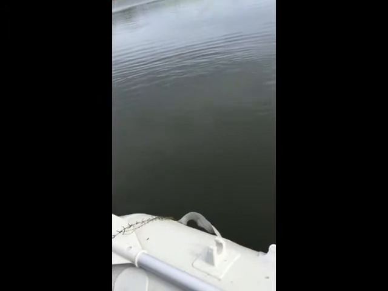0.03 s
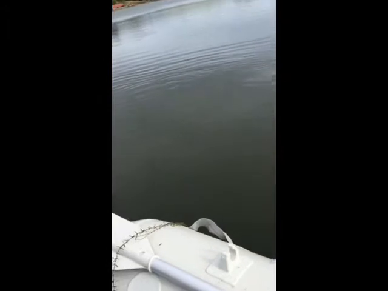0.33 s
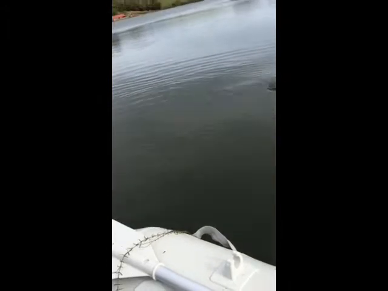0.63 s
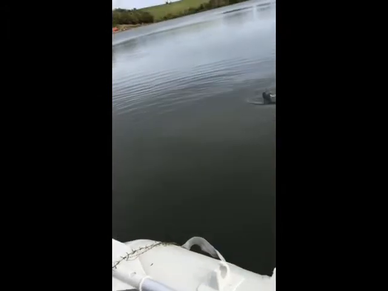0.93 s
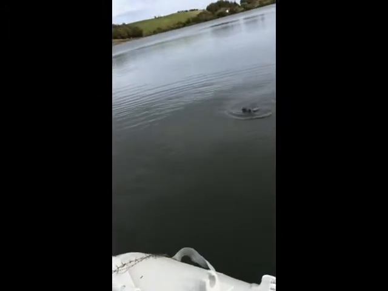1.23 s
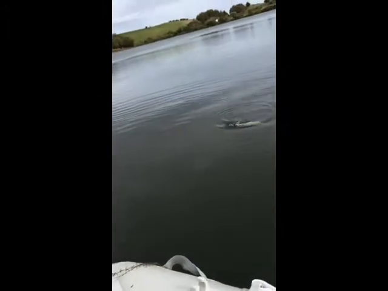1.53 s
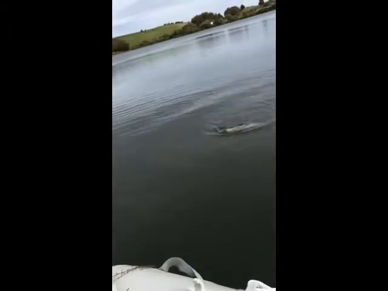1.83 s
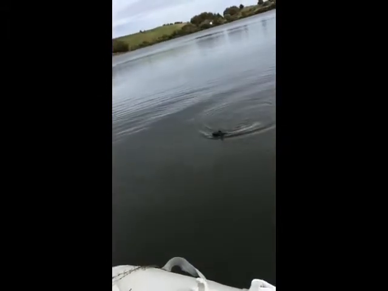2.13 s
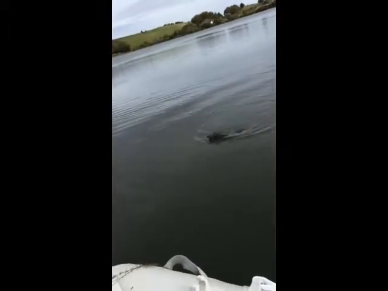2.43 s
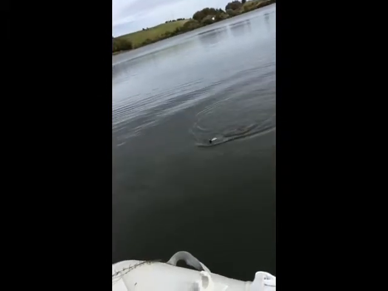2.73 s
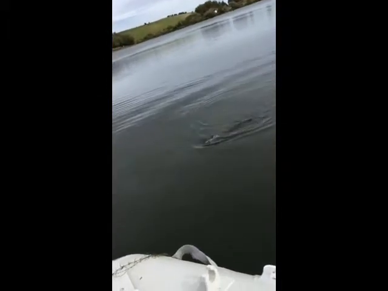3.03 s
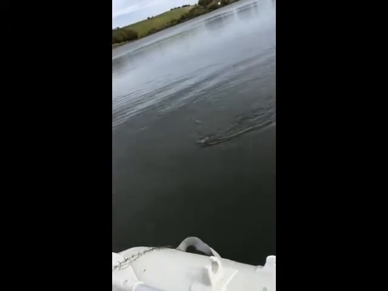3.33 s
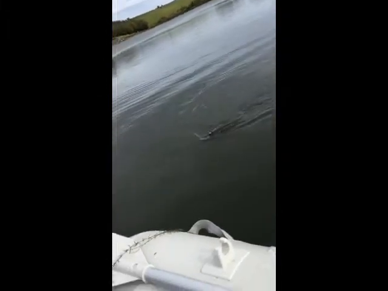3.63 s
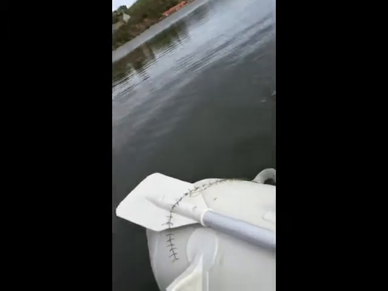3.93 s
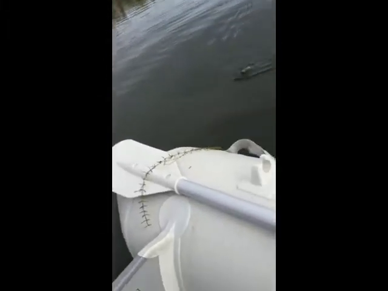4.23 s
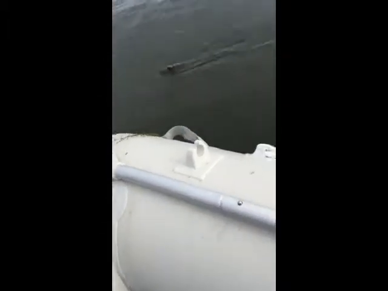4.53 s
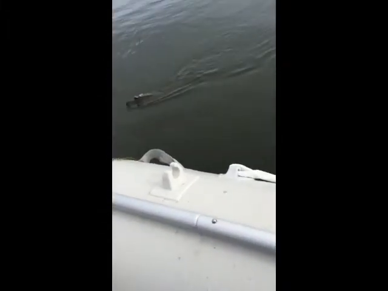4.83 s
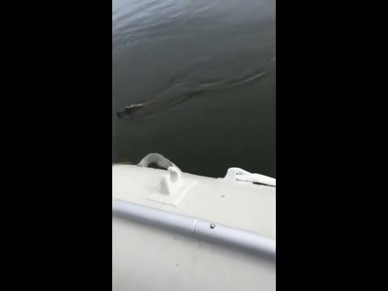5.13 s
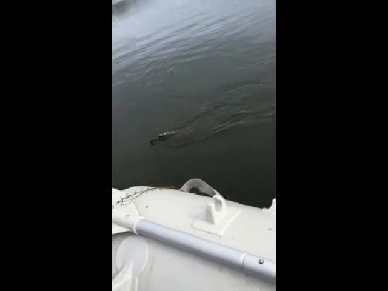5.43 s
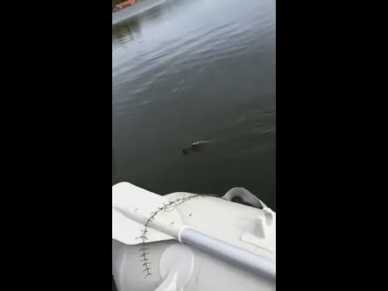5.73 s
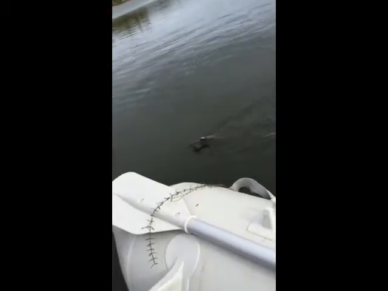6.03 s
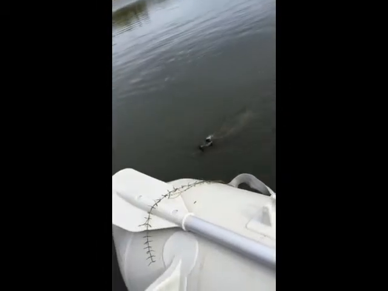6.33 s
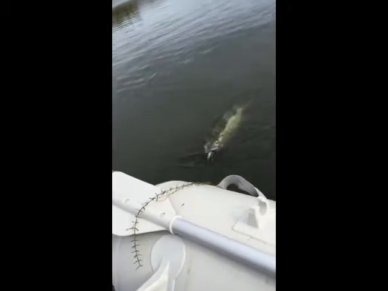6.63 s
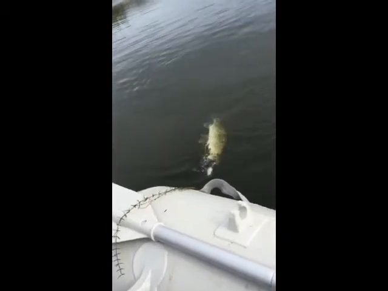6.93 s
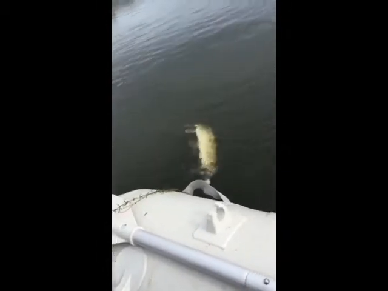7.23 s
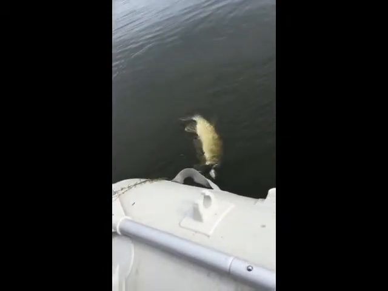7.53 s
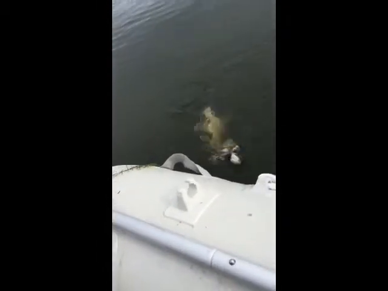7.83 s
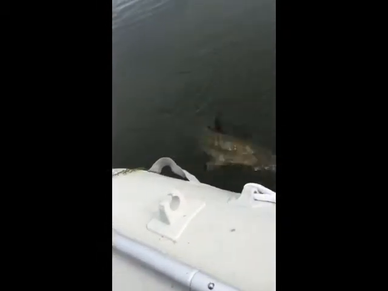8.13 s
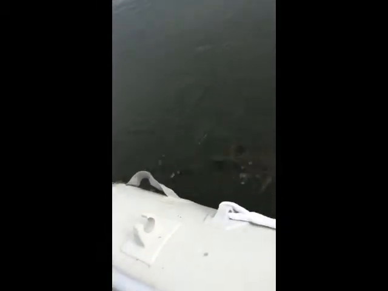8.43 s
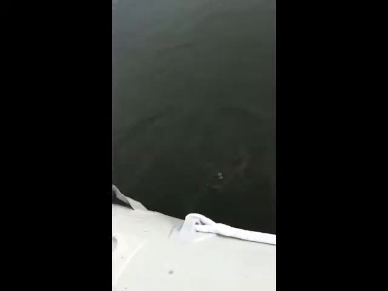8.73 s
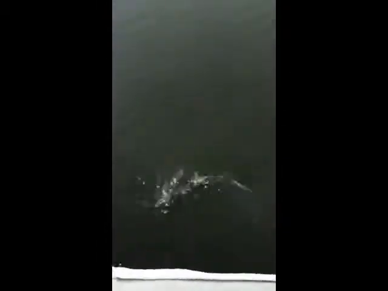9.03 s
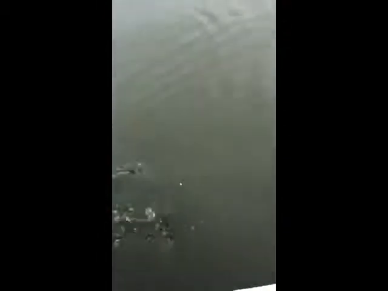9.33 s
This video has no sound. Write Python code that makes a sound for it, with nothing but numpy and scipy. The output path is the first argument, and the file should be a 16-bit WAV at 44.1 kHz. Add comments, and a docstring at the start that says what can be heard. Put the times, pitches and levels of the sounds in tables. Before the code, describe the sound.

A soft wash of open air and low wind bumps lie under seven short waterfowl yelps and a few faint, distant songbird whistles. After the calls stop, a fish splashes close to the microphone beside a boat and fishing line runs out with a brief hiss. A second, louder splash follows, a quick smack with gurgling water, bubbles and drops falling back on the lake.

```python
"""A calm lake, the microphone by an inflatable boat. A hooked fish is drawn in across the water; the
line hisses out, and the fish swirls and dives close by with a slap of its tail. Spray ticks on the
surface, trapped bubbles ring and the hole in the water gulps shut. A waterfowl yelps about once a
second, echoed by the shore, small birds whistle far off, and light wind bumps the microphone."""
import sys
import numpy as np
from scipy import signal
from scipy.fft import rfft, irfft, next_fast_len
from scipy.io import wavfile
from scipy.ndimage import map_coordinates

SR = 44100
rng = np.random.default_rng(int(sys.argv[2]) if len(sys.argv) > 2 else 0)


def wrap_up_sound(samples):
    """Save the sound to the file named by the first command line argument, as 16-bit audio."""
    columns = np.atleast_2d(samples).T
    # keep every value between -1 and 1, then stretch to whole-number steps
    tamed = np.clip(columns, -1, 1)
    steps = np.round(tamed * 32767).astype(np.int16)
    wavfile.write(sys.argv[1], SR, steps)


N = 418509
T = np.arange(N) / SR
BAND_LIMIT_HZ = 15420

# far wash of open air, relative levels: (time [s], low part [dB], middle part [dB], top part [dB])
AIR_LEVELS = [(0, -53, -56.5, -66.5), (0.7, -51.5, -55.5, -63), (1.4, -50, -50.5, -59.5),
              (2.1, -49.5, -51, -60), (3.0, -52.5, -51.5, -61), (3.2, -58, -49.5, -61.5),
              (3.65, -53, -48.5, -59.5), (3.9, -67, -50, -64), (4.3, -57.5, -51.5, -65.5),
              (4.8, -56, -55.5, -68), (5.15, -54.5, -58.5, -69), (5.55, -51.5, -53.5, -74),
              (6.1, -57, -58.5, -66.5), (6.45, -56.5, -58, -64.5), (7.3, -60, -58, -66),
              (7.8, -55.5, -56, -70), (8.3, -51.5, -46.5, -61), (8.9, -56, -49.5, -89),
              (9.49, -54, -47, -77)]
# faint drone in the wash: (time [s], level [dB])
DRONE_LEVELS = [(0, -68), (1.2, -63.5), (1.65, -49.5), (2.3, -58.5), (2.8, -52.5), (3.3, -58.5), (4.0, -55),
                (4.8, -69), (5.6, -60), (6.0, -65.5), (6.35, -54.5), (7.2, -67), (9.49, -57)]
# spectra of the wash's three parts, its drone and the microphone's hiss: (frequency [Hz], gain [dB])
AIR_LOW_SPECTRUM = [(20, -31), (70, -5.5), (150, -4), (260, 1), (450, -5), (700, -9), (1200, -13.5),
                    (3000, -60)]
AIR_MID_SPECTRUM = [(200, -51), (450, -8), (620, 0.5), (800, 0.5), (980, 0.5), (1170, 0), (1350, -3),
                    (1620, -5.5), (2000, -18), (3000, -46), (16000, -78)]
AIR_TOP_SPECTRUM = [(900, -42), (1400, 1), (1700, 4), (2050, -2.5), (2400, -3), (2700, -9.5), (3400, -12.5),
                    (5000, -26.5), (16000, -57)]
DRONE_SPECTRUM = [(780, -49), (910, -6), (980, -2), (1050, -9.5), (1200, -30), (1390, -7.5), (1560, -46),
                  (3000, -76)]
HISS_SPECTRUM = [(100, -16), (2500, 5.5), (5000, -1), (9000, -5.5), (11500, -6.5), (15500, -12)]

# breeze at the microphone: (time [s], relative level [dB])
BREEZE_LEVELS = [(0, -61.5), (1.3, -54.5), (2.2, -51.5), (3.5, -50.5), (3.9, -57), (4.55, -51.5),
                 (4.85, -43), (5.25, -50), (5.85, -45.5), (6.3, -44.5), (6.9, -41), (7.8, -47.5),
                 (8.6, -51.5), (9.49, -62)]
# gusts that bump the microphone: (time [s], length [s], level [dB])
GUSTS = [(1.52, 0.045, -46), (1.68, 0.011, -44.5), (2.19, .02, -45), (2.49, 0.028, -46), (3.51, .02, -46.5),
         (3.64, 0.087, -49.5), (4.672, 0.018, -31), (4.73, 0.032, -38), (4.88, 0.051, -41),
         (5.7, 0.092, -44), (5.905, 0.012, -32.5), (5.945, 0.039, -39), (6.1, 0.019, -30),
         (6.165, 0.014, -38), (6.25, .05, -42), (6.435, 0.043, -36.5), (6.52, 0.043, -36),
         (6.605, .012, -37), (6.735, 0.026, -36), (6.87, 0.024, -38.5), (7.235, 0.0098, -34),
         (7.29, 0.029, -39), (7.695, 0.02, -43.5), (8.28, 0.021, -51), (9.345, 0.019, -44)]
# rumble of wind on the microphone: (frequency [Hz], gain [dB])
WIND_SPECTRUM = [(12, -49), (20, -32), (52, 0.5), (76, 1.5), (116, -4.5), (177, -15), (197, -12),
                 (221, -46), (260, -56), (340, -57), (570, -120)]

# waterfowl calls: (time [s], relative level [dB], lift of the top overtones [dB], top pitch [Hz])
YELPS = [(0.623, -36, 4, 855), (1.585, -39, 6, 840), (2.507, -37.5, 0, 839), (3.494, -39.5, 2.5, 857),
         (4.514, -38, -8, 851), (5.614, -38.5, 1.5, 843), (6.854, -39.5, 0, 837)]
# resonances of its throat: (frequency [Hz], gain [dB])
THROAT_SPECTRUM = [(750, -15), (1400, 6), (1650, 4.5), (2050, -11), (2450, -4), (2700, -0.5), (3000, -5.5),
                   (3400, -1), (3750, -24), (4200, -11.5), (5000, -27), (6200, -18), (8000, -34.5),
                   (12000, -31)]
# drops landing on the lake: (time [s], tick peak [dB], bubble peak [dB], bubble pitch [Hz])
DROPS = [(0.637, -48, -37.5, 6800), (0.641, -52, -40, 3600), (0.6565, -38, -40, 5150),
         (0.698, -56, -55, 6050), (8.078, -41, -34, 5970), (8.0777, -58, -36, 3520),
         (8.097, -31, -32.5, 1920), (8.157, -41, -30.5, 816), (8.2356, -33, -34.5, 6030),
         (8.298, -50, -44, 2660), (8.33, -34, -42, 11000), (8.336, -25.5, -30.5, 2460),
         (8.366, -41, -35.5, 8000), (8.515, -43, -40, 4500), (9.015, -36, -21.5, 2710),
         (9.0219, -32, -31, 3320), (9.0247, -30, -23, 6440), (9.032, -39, -46, 7500),
         (9.0375, -32, -37, 5970), (9.0495, -41, -45, 8500), (9.054, -35, -44, 3600),
         (9.061, -33, -31, 2970), (9.074, -24, -47, 4020), (9.0798, -28, -23.5, 1400),
         (9.093, -35, -31, 670), (9.103, -20.5, -39, 5570), (9.1197, -34, -48, 6000),
         (9.1445, -41, -42, 4650), (9.17, -31, -49, 4700), (9.186, -39, -46, 3300),
         (9.2092, -37, -26.5, 1320), (9.2325, -42, -49, 5400), (9.25, -39, -52, 5500),
         (9.257, -38, -38, 342), (9.2675, -35, -48, 3900), (9.3075, -41, -50, 5200),
         (9.314, -48, -41, 4350), (9.3415, -38, -31, 4030), (9.433, -42, -38.5, 2380)]
# distant songbirds: (time [s], length [s], relative level [dB], start pitch [Hz], end pitch [Hz])
WHISTLES = [(1.284, 0.12, -68, 6100, 5750), (2.838, 0.13, -63, 5890, 5740), (4.756, 0.06, -68, 3440, 3340),
            (4.842, 0.041, -69, 3220, 3070), (4.917, 0.12, -77, 5920, 5740),
            (5.415, 0.069, -77, 4350, 4250), (5.582, 0.03, -72, 4200, 4180), (7.524, 0.12, -68, 5890, 5850)]
# hollows closing in the water: (time [s], length [s], start pitch [Hz], end pitch [Hz],
# start level [dB], end level [dB], swell midway [dB], lateness of the glide [power], raggedness [0-1])
GULPS = [(1.932, 0.031, 629, 1294, -36.5, -45, 9.5, 1.01, 0.2),
         (8.215, 0.058, 75.5, 98, -29.5, -42, -1.5, 1.1, 1),
         (9.094, .115, 228.4, 629, -26.5, -25.5, -3.5, 3.5, 0.7),
         (9.21, .095, 323.6, 1250, -45, -26, -8.5, 6, 0.74),
         (9.243, .013, 1090, 600, -29, -34, -0.5, 0.97, 0.56)]

# slaps, from small laps to the smack of the tail: (time [s], peak [dB], centre [Hz], decay time [s])
SLAPS = [(3.806, -46.5, 1390, 0.0013), (4.033, -56, 1150, 0.0071), (8.262, -36.5, 190, 0.01),
         (8.301, -30.5, 3500, 0.0028), (9.068, -11, 1000, 0.00086), (9.081, -32, 1700, 0.0082),
         (9.194, -30.5, 780, 0.011), (9.2035, -29.5, 1500, 0.0017), (9.248, -42, 800, 0.004),
         (9.3327, -24, 900, 0.0018)]
# air driven under by the tail: (peak [dB], pitch [Hz], glide [octaves], time to the peak [s])
AIR_POCKETS = [(-16.5, 320, 1, 0.0025), (-19.5, 950, -0.35, 0.00075), (-27, 2430, -0.21, 0.0024)]

# thin swishes of the line: (time [s], length [s], level [dB])
LINE_SWISHES = [(4.36, 0.038, -60), (4.47, 0.051, -68.5), (4.62, 0.017, -69)]
# the line creeps out, then runs: (time [s], length [s], level [dB], rise time [s])
LINE_RUNS = [(8, 0.58, -58.5, 0.09), (8.532, 0.31, -50, 0.0064), (8.743, 0.08, -58, 0.027)]
# spectra of the swishing and the running line: (frequency [Hz], gain [dB])
SWISH_SPECTRUM = [(1500, -25), (3000, -9), (4500, 2), (8500, 2), (10500, 0), (15000, -5)]
RUN_SPECTRUM = [(880, -35), (1500, -26), (1780, -9), (2060, -5), (2410, 4.5), (2970, -1), (4080, 1),
                (4900, -4), (6240, -6), (7420, -10), (9400, -10), (14800, -18), (15500, -28), (16000, -47)]

# larger bubbles under the surface: (time [s], peak [dB], pitch [Hz])
BUBBLES = [(6.998, -47.5, 2620), (8.311, -33, 1800), (8.663, -40, 1740), (8.743, -34, 1860),
           (9.025, -34, 2280), (9.084, -29, 1430), (9.09, -31.5, 2350), (9.131, -41, 2500),
           (9.16, -46, 1380), (9.176, -47, 2480), (9.192, -46, 3260), (9.203, -33, 1430),
           (9.214, -30.5, 1010), (9.3327, -20.5, 1765), (9.34, -33, 930), (9.34, -37, 2400),
           (9.393, -39.5, 3350), (9.402, -46, 3450), (9.47, -39.5, 1870)]
# water thrown up by the fish: (time [s], relative level [dB])
THROWS = [(8.097, -46.5), (8.312, -40.5), (8.43, -47.5), (9.022, -49), (9.066, -37.5), (9.083, -43),
          (9.1, -42), (9.172, -50), (9.205, -48), (9.265, -44.5), (9.345, -42)]
# spectra of droplets, froth and churned water: (frequency [Hz], gain [dB])
SPATTER_SPECTRUM = [(400, -22), (1500, -6), (3500, -4), (7000, 0), (10000, 3), (16000, -10)]
FROTH_SPECTRUM = [(400, -10), (1200, 2), (2400, 6.5), (3500, 0.5), (6000, -18)]
CHURN_SPECTRUM = [(150, -33), (400, 7), (1200, 5), (2400, 0.5), (3500, -1), (5000, -24), (7000, -7),
                  (10000, -22), (16000, -16)]


def gain_of(db):
    """Decibels to gain."""
    return 10 ** (np.asarray(db) / 20)


def unit_rms(x):
    """Scales to rms 1."""
    return x / np.sqrt(np.mean(x ** 2) + 1e-20)


def db_at(spectrum, hz):
    """Reads a spectrum, its points joined on a log-frequency axis."""
    points_hz, db = np.transpose(spectrum)
    return np.interp(np.log(hz + 1), np.log(points_hz + 1), db)


def level(rows, column=1):
    """One dB column of a curve as a gain for every sample."""
    rows = np.asarray(rows)
    return gain_of(np.interp(T, rows[:, 0], rows[:, column]))


def add(mix, s, sound):
    """Mixes a sound in at time s."""
    part = mix[round(s * SR):][:len(sound)]
    part += sound[:len(part)]


def phase_of(hz):
    """Running phase of a moving pitch, in radians."""
    return 2 * np.pi * np.cumsum(hz) / SR


def coloured(x, spectrum):
    """Filters a signal by a spectrum, at rms 1."""
    size = next_fast_len(len(x))
    gains = gain_of(db_at(spectrum, np.fft.rfftfreq(size, 1 / SR)))
    return unit_rms(irfft(rfft(x, size) * gains, size)[:len(x)])


def noise(spectrum):
    """Noise with a given spectrum."""
    return coloured(rng.standard_normal(N), spectrum)


def wander(t, per_s):
    """A random curve of about unit size; it holds still after its last knot."""
    knots = rng.standard_normal(4096)
    return np.interp(t * per_s, np.arange(len(knots)), knots)


def clicks(per_s, spread_db):
    """Clicks at random moments, most of them small."""
    chance, size = rng.random(N), np.minimum(rng.exponential(1, N), 3)
    return (chance < per_s / SR) * gain_of(spread_db * size)


def patchy(x, depth_db, width_hz, length_s):
    """Lets each region of pitch swell and fade by itself, as sound does over moving air and water."""
    spectra = signal.stft(x, nperseg=512, noverlap=384)[2]
    bins, frames = np.indices(spectra.shape)
    where = [bins * SR / 512 / width_hz, frames * 128 / SR / length_s]
    patches = unit_rms(map_coordinates(rng.standard_normal((256, 800)), where, order=1))
    spectra = spectra * gain_of(depth_db * patches)
    return unit_rms(signal.istft(spectra, nperseg=512, noverlap=384)[1][:N])


def swell(s, length, rise_s, fall_s):
    """An envelope that grows up to time s, holds, and dies away."""
    rising = np.minimum((T - s) / rise_s, 0)
    falling = np.maximum(T - s - length, 0) / fall_s
    return np.exp(np.maximum(rising - falling, -30))


def swells(rows, rise_s, fall_s):
    """The joint envelope of events (time [s], length [s], level [dB])."""
    return np.sqrt(sum((gain_of(db) * swell(s, length, rise_s, fall_s)) ** 2 for s, length, db in rows))


def echoes(x, t60, top_hz):
    """A tail of sparse, dull reflections."""
    t = T[:SR]
    taps = rng.standard_normal(SR) * (rng.random(SR) < .1) * (t > .004) * gain_of(-60 * t / t60)
    taps = signal.sosfilt(signal.butter(2, top_hz, fs=SR, output="sos"), taps)
    return signal.oaconvolve(x, taps / np.linalg.norm(taps) * np.sqrt(2 * top_hz / SR))[:N]


def open_air():
    """A far wash in three parts that swell separately, a faint drone, and steady microphone hiss."""
    low = patchy(noise(AIR_LOW_SPECTRUM), depth_db=3, width_hz=129, length_s=.04)
    low *= level(AIR_LEVELS, column=1) * gain_of(0.82)
    middle = patchy(noise(AIR_MID_SPECTRUM), depth_db=2.5, width_hz=240, length_s=.035)
    middle *= level(AIR_LEVELS, column=2)
    drone = noise(DRONE_SPECTRUM) * level(DRONE_LEVELS)
    top = patchy(noise(AIR_TOP_SPECTRUM), depth_db=3, width_hz=416, length_s=.035)
    top *= level(AIR_LEVELS, column=3)
    flicker = gain_of(-0.16 + 0.72 * wander(T, 11))
    return low + drone + (middle + top) * flicker + gain_of(-70.5) * noise(HISS_SPECTRUM)


def wind(lumps_db=3.0, lumps_per_s=18):
    """Air rumbles right on the microphone: a lumpy breeze with brief gusts."""
    breeze = level(BREEZE_LEVELS) * gain_of(-1.5 + lumps_db * wander(T, lumps_per_s))
    gusts = swells(GUSTS, rise_s=0.006, fall_s=0.011)
    return noise(WIND_SPECTRUM) * np.hypot(breeze, gusts)


def waterfowl(length_s=0.083, crest_s=0.01314, jitter=0.026, rasp=0.36, rattle_hz=103, rattle_db=3.5):
    """Short rattling yelps: ragged harmonics through a fixed throat, echoed by the shore."""
    out = np.zeros(N)
    t = T[:int(length_s * SR)]
    past_crest = t - crest_s  # each call scoops up to its top pitch, cracks there, and sags
    scoop_hz = 1930 * np.maximum(-past_crest, 0)
    sag_hz = 202.5 * (1 - np.exp(-np.maximum(past_crest, 0) / 0.048))
    crack_db = 6.5 * np.exp(-(past_crest / 0.0031) ** 2)
    bite = np.exp(-t / 0.013)  # it opens bright, then its weight falls to the low partials
    envelope = np.minimum(t / 0.003, 1) * gain_of(-9.5 * (t / length_s) ** 2.3)
    for s, db, top_db, top_hz in YELPS:
        hz = (top_hz - scoop_hz - sag_hz) * (1 + jitter * wander(t, 892))
        phase = phase_of(hz)
        voice = np.zeros(len(t))
        for k in range(1, 13):
            flutter_db = 4.5 * np.minimum(t / .04 + .2, 1) * wander(t, 150)
            opening_db = crack_db * (k in (4, 9)) + 12.5 * bite * np.clip((k - 3.2) / 2, -1, .5)
            colour_db = db_at(THROAT_SPECTRUM, k * hz) + top_db * (k > 5)
            dulling_db = 20 * k * t  # higher overtones die sooner
            size = gain_of(colour_db + flutter_db + opening_db - dulling_db)
            voice += size * np.sin(k * phase + 1.1 * wander(t, 170))
        voice = unit_rms(voice) + rasp * coloured(rng.standard_normal(len(t)), THROAT_SPECTRUM)
        uneven_time = np.cumsum(1 + .22 * wander(t, rattle_hz)) / SR
        rattle = np.cos(2 * np.pi * rattle_hz * (uneven_time - crest_s))
        effort = envelope * gain_of(db + rattle_db * (rattle - .5))
        add(out, s, unit_rms(voice) * effort * signal.windows.tukey(len(t), .05))
    near = gain_of(-15.5) * echoes(out, t60=0.073, top_hz=5000)
    shore = gain_of(-12.5) * echoes(out, t60=0.49, top_hz=1920)
    return gain_of(-6) * out + near + shore


def impact(db, hz, decay_s):
    """A blow on the surface: a sharp burst of noise around a centre pitch."""
    t = T[:2048]
    band_hz = [hz / 1.4, min(hz * 1.4, BAND_LIMIT_HZ)]
    burst = rng.standard_normal(len(t)) * np.exp(-t / decay_s)
    burst = signal.lfilter(*signal.butter(1, band_hz, "bandpass", fs=SR), burst)
    return gain_of(db) * burst / abs(burst).max()


def air_pocket(hz, glide_oct, swell_s, roundness=1):
    """Trapped air swells into a ring and dies, its pitch sliding with its depth."""
    age = T[:int(10 * swell_s * SR)] / swell_s
    pitch = hz * 2 ** (glide_oct * np.tanh(age / 4))
    return (age * np.exp(1 - age)) ** roundness * np.sin(phase_of(pitch))


def bubble(db, hz, glide_oct, swell_at_1khz_s, roundness=1):
    """A pocket of air timed by its size: the smaller and higher, the sooner it dies."""
    return gain_of(db) * air_pocket(hz, glide_oct, swell_at_1khz_s * np.sqrt(1000 / hz), roundness)


def drops():
    """Each drop ticks as it lands and sets a small bubble ringing."""
    out = np.zeros(N)
    for s, tick_db, bubble_db, hz in DROPS:
        add(out, s, impact(tick_db, hz=6150, decay_s=0.0015))
        add(out, s, bubble(bubble_db, hz, glide_oct=-0.1, swell_at_1khz_s=0.0013))
    return out


def songbirds():
    """Thin, far whistles that drop, level off and fade, fluttering on their way over the water."""
    out = np.zeros(N)
    for s, length, db, start_hz, end_hz in WHISTLES:
        t = T[:int(length * SR)]
        progress = t / length
        hz = (end_hz + (start_hz - end_hz) * (1 - progress) ** 2) * (1 + 0.006 * wander(t, 900))
        flutter_db = 2.2 * wander(t, 90)
        envelope = gain_of(db + 5.5 + flutter_db) * np.sin(np.pi * progress ** 0.82)
        add(out, s, envelope * np.sin(phase_of(hz)))
    return out + gain_of(-8) * echoes(out, t60=.32, top_hz=7000)


def gulps(wobble=0.12, overtone=0.14):
    """A hollow in the water rings, gliding in pitch and trembling more as it closes."""
    out = np.zeros(N)
    for s, length, start_hz, end_hz, start_db, end_db, swell_db, lateness, ragged in GULPS:
        t = T[:int(length * SR)]
        progress = t / length
        tremble = ragged * (.5 + progress)
        glide_hz = start_hz + (end_hz - start_hz) * progress ** lateness
        phase = phase_of(glide_hz * (1 + wobble * tremble * wander(t, 348.5)))
        arc_db = start_db + (end_db - start_db) * progress + swell_db * np.sin(np.pi * progress)
        size = gain_of(arc_db + 3 * tremble * wander(t, 218))
        # the ragged wall of the hollow adds a fitful upper mode
        ring = np.sin(phase) + ragged * overtone * (1 + wander(t, 204)) * np.sin(2.3 * phase)
        gurgle = 1 + .3 * tremble * progress * wander(t, 800)
        add(out, s, size * signal.windows.tukey(len(t), .15) * ring * gurgle)
    return out


def slaps():
    """Water is slapped or shoved; the hardest blow, from the tail, drives air under the surface."""
    out = np.zeros(N)
    for s, db, hz, decay_s in SLAPS:
        add(out, s, impact(db, hz, decay_s))
    tail_s = max(SLAPS, key=lambda row: row[1])[0]
    for db, hz, glide_oct, swell_s in AIR_POCKETS:
        add(out, tail_s, gain_of(db) * air_pocket(hz, glide_oct, swell_s))
    return out


def fishing_line():
    """Line slides out under an uneven load: hiss and fine slips, thinner when it only swishes."""
    pull = sum(gain_of(db) * swell(s, length, rise_s, fall_s=0.016)
               for s, length, db, rise_s in LINE_RUNS)
    pull *= gain_of(0.5 * wander(T, 25))
    rubbing = rng.standard_normal(N) + gain_of(-1) * unit_rms(clicks(per_s=1500, spread_db=3))
    rubbing = coloured(rubbing - rubbing.mean(), RUN_SPECTRUM)
    running = patchy(rubbing, depth_db=1.5, width_hz=940, length_s=.014) * pull
    swishing = noise(SWISH_SPECTRUM) * swells(LINE_SWISHES, rise_s=0.011, fall_s=0.015)
    return (running + swishing) * gain_of(0.75 * wander(T, 570))


def large_bubbles():
    """Single bubbles ring out from under the surface at a nearly steady pitch."""
    out = np.zeros(N)
    for s, db, hz in BUBBLES:
        add(out, s, bubble(db, hz, glide_oct=0.011, swell_at_1khz_s=0.0045, roundness=1.7))
    return out


def thrown_water(hold_s=.003, rise_s=0.0096):
    """How much water is in motion: each throw is a quick burst, then a long patter as it rains back."""
    throws = [(s, hold_s, db) for s, db in THROWS]
    burst = swells(throws, rise_s, fall_s=0.01)
    patter = gain_of(-14) * swells(throws, rise_s, fall_s=0.36)
    return np.hypot(burst, patter)


def spray(ticks_per_s=2400, tick_kinds=12, bubbles_per_s=1300, bubble_sizes=24, swell_cycles=7.3):
    """A dense spatter of droplets and a froth of small bubbles, over the slosh of churned water."""
    tick_decay = np.exp(-T[:256] / 0.00046)
    spatter, froth = np.zeros(N), np.zeros(N)
    for _ in range(tick_kinds):
        landings = clicks(ticks_per_s / tick_kinds, spread_db=8)
        tick = tick_decay * rng.standard_normal(len(tick_decay))
        spatter += signal.oaconvolve(landings, tick)[:N]
    spatter = patchy(coloured(spatter, SPATTER_SPECTRUM), depth_db=4, width_hz=1080, length_s=0.013)
    for hz in np.geomspace(900, 5600, bubble_sizes):
        births = clicks(bubbles_per_s / bubble_sizes, spread_db=5)
        ring = air_pocket(hz, glide_oct=-0.076, swell_s=swell_cycles / hz)
        froth += unit_rms(signal.oaconvolve(births, ring)[:N])
    froth = coloured(froth, FROTH_SPECTRUM)
    churn = patchy(noise(CHURN_SPECTRUM), depth_db=1.5, width_hz=390, length_s=.014)
    return (gain_of(-10) * spatter + gain_of(-3) * froth + gain_of(-6) * churn) * thrown_water()


def scene():
    """Close by, the splash, its faint reflections off the boat and the line; around, birds and air."""
    splash = slaps() + large_bubbles() + gulps() + drops() + spray()
    off_boat = gain_of(-13.5) * echoes(splash, t60=0.12, top_hz=6100)
    return (splash + off_boat + fishing_line() + waterfowl() + songbirds() + open_air() + wind())[None]


def record(dry, notch_hz=10400, notch_q=12):
    """One microphone with a narrow dip in its treble and a steep band limit."""
    notched = signal.lfilter(*signal.iirnotch(notch_hz, notch_q, fs=SR), dry)
    lowpass = signal.firwin(511, BAND_LIMIT_HZ, window=("kaiser", 9), fs=SR)
    return signal.oaconvolve(.3 * dry + .7 * notched, lowpass[None], "same")


dry = scene()
out = record(dry)
wrap_up_sound(out)
```